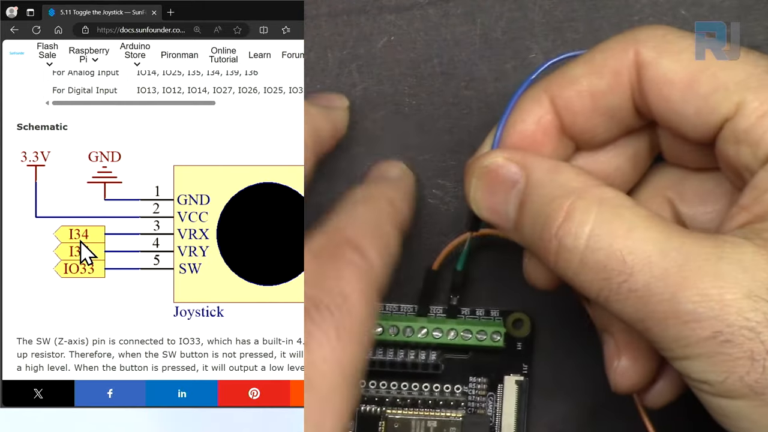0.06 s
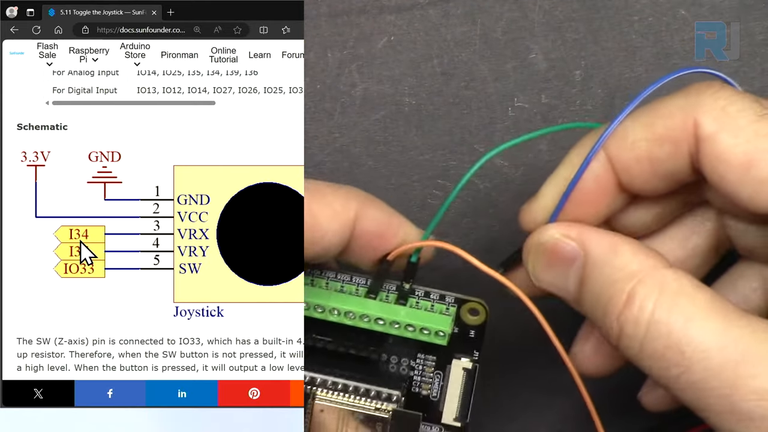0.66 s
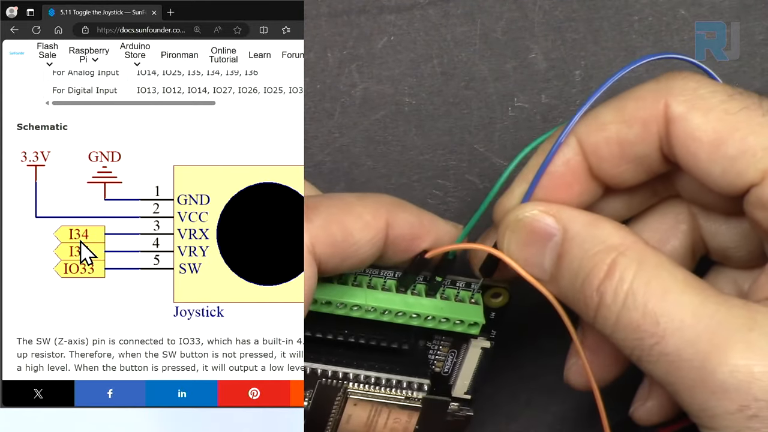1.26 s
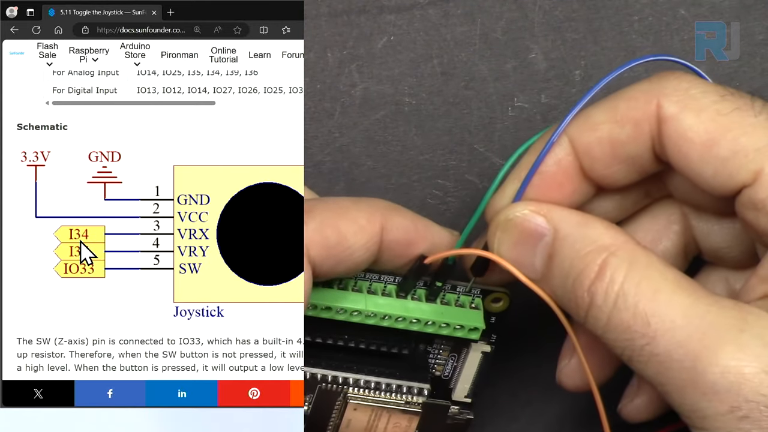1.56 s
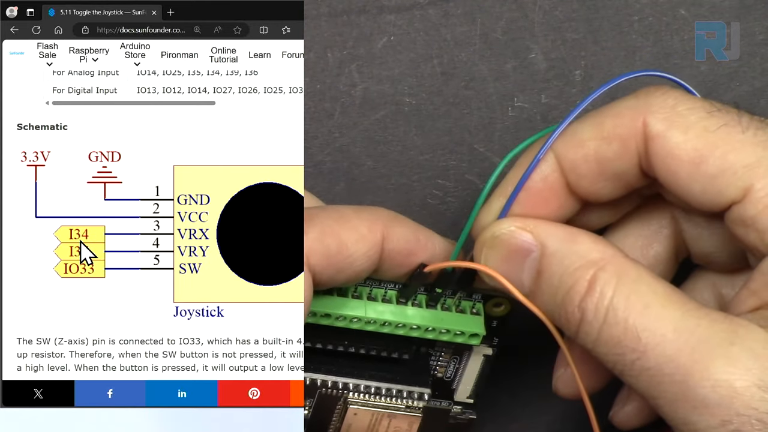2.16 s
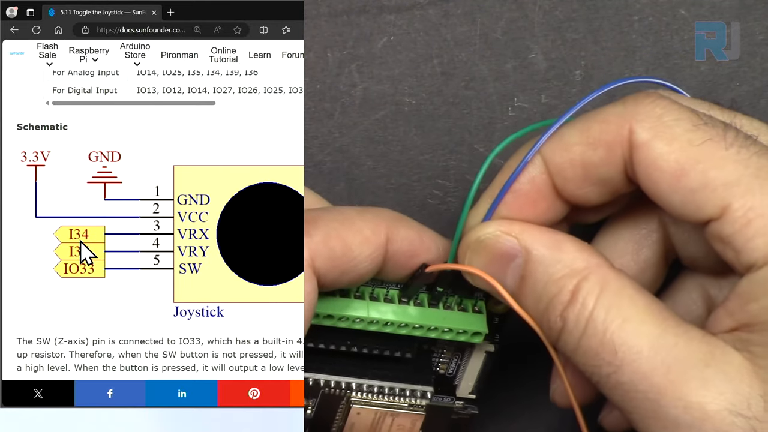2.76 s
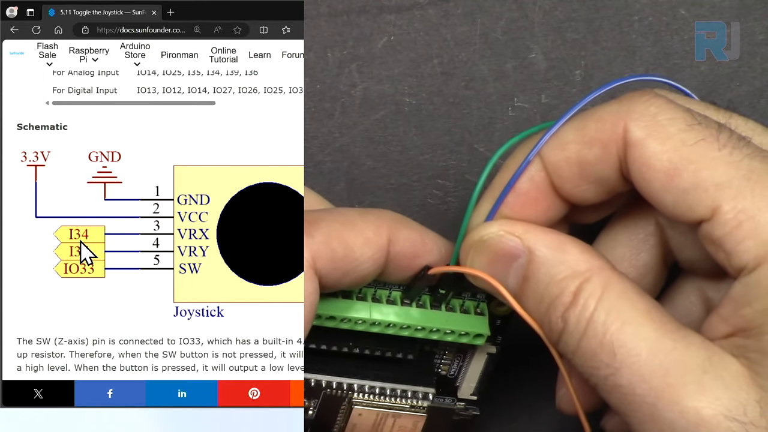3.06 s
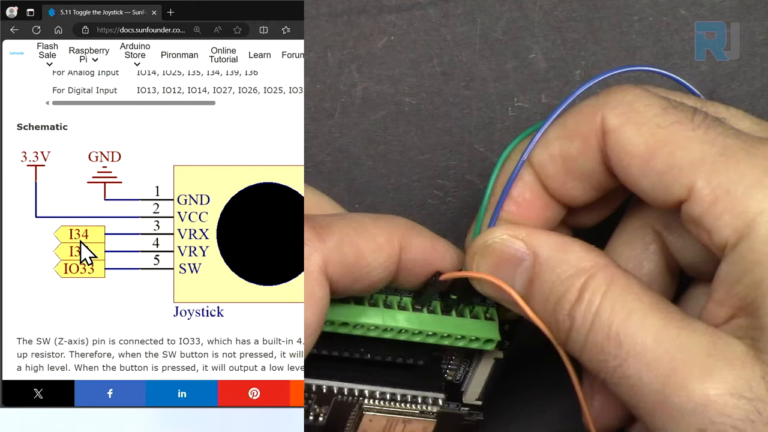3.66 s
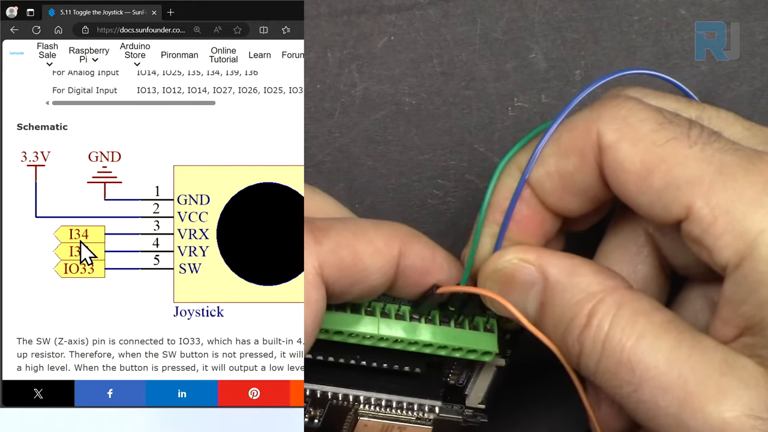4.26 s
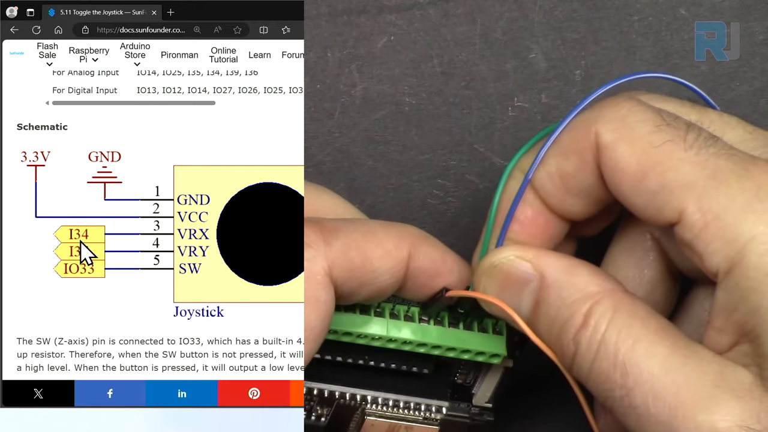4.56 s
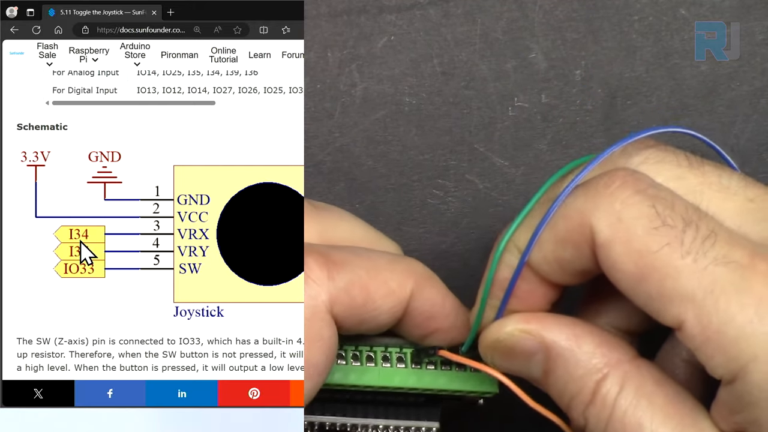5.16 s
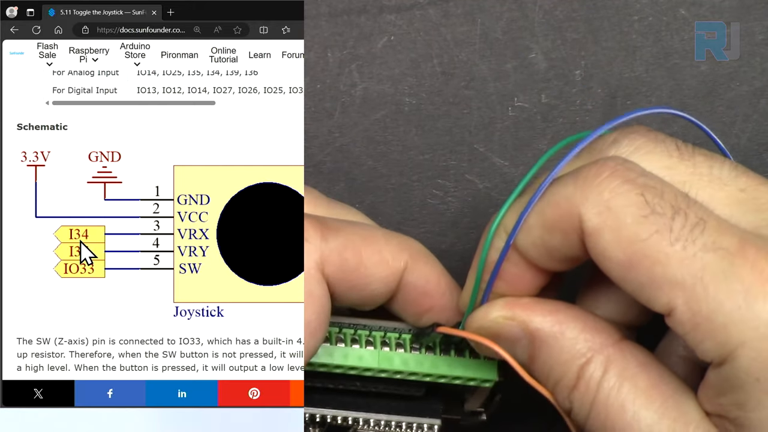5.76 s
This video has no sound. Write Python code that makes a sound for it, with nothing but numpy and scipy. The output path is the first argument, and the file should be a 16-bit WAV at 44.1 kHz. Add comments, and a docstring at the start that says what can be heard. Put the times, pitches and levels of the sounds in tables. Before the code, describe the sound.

Right at the start, a small circuit board knocks on a desk with a short, hollow ring, and a sharp plastic plug click follows at about 0.15 seconds. The board scrapes briefly on a mat while fingers rustle along wires until about 0.6 seconds. A lighter click comes near 0.8 seconds, then a lull. Between 2 and 3.2 seconds, plugs tick faintly against pins, most clearly around 2.9 and 3.1 seconds. From about 3.7 seconds, fingers rub the wires very softly. Handling grows a little from 5 seconds, with a few tiny ticks, the board sliding on the mat, a faint desk rumble and one more click near 5.8 seconds. Everything after the opening is quiet. The microphone is close, in a small room with steady soft air noise and a faint low electrical hum.

```python
"""First comes a sharp knock and click, close up: a small circuit board rocks on a desk mat as hands
push jumper wires onto its header pins. Plastic plugs snap against the pins, the board sticks and slips
over the mat, and fingers rustle along the wires, with a lull midway and more handling near the end.
One close microphone hears it all in a small room, over soft air and a faint mains hum."""
import sys
import numpy as np
from scipy import signal
from scipy.fft import rfft, irfft, next_fast_len
from scipy.io import wavfile
from scipy.ndimage import uniform_filter1d

SR = 44100
rng = np.random.default_rng(int(sys.argv[2]) if len(sys.argv) > 2 else 0)


def output_pcm(signal):
    """Save a mono or channel-first signal as 16-bit PCM at the path in sys.argv[1].

    Samples are clipped to [-1, 1] before scaling.
    """
    pcm = np.clip(np.atleast_2d(signal).T, -1, 1) * 32767
    wavfile.write(sys.argv[1], SR, np.round(pcm).astype(np.int16))


N = 265349
TIME = np.arange(N) / SR

# The board rocking onto the desk. Each row: start in seconds, peak in dB, contact time in ms.
BOARD_KNOCKS = [(0.0614, -14, 0.45), (.0644, -14.5, 0.88), (.1495, -35.5, 0.22), (5.571, -54, 3.1)]
# Modes of the board on the desk. Each row: frequency in Hz, level in dB, time to fall 60 dB in seconds.
BOARD_MODES = [(391, -8.5, 0.17), (440, -4.5, 0.18), (579, -4, 0.068), (635, 9, .014), (786, -15, .12),
               (940, -13.5, .1), (1120, -0.5, .065), (1281, -21, .1), (1510, -23, .17), (1750, -5, 0.016)]
# Plugs meeting pins. Each row: start in seconds, peak in dB, ring in Hz, ring over snap in dB,
# rebound delay in ms, housing resonance in Hz, housing over snap in dB.
PLUG_CLICKS = [(0.051, -38.5, 4150, 5, .9, 3800, 4), (0.0628, -29, 7000, -2.5, 1.2, 5100, -10),
               (.1478, -15.5, 3690, 0.5, 0.715, 3000, -9.5), (0.1488, -31.5, 2080, 5, 2.2, 1510, -3),
               (0.2447, -35.5, 5300, 5, .6, 4600, -14), (0.7745, -35, 4650, 5, .76, 5670, -18),
               (2.11, -57, 5800, -3, 1, 4000, -14), (2.517, -53.5, 4500, -4, 1.6, 2000, -8),
               (2.701, -57, 5500, -9, 1, 4000, -16), (2.85, -37.5, 6300, -10, 1.5, 1860, -17),
               (2.9613, -49, 6460, -5.5, 0.68, 5050, -12), (3.1158, -41, 5400, -10, .65, 2600, -17),
               (3.1263, -44, 6560, -11, 0.7, 2000, -22), (5.019, -51, 6200, -3, 1.1, 4000, -10),
               (5.061, -48.5, 6600, -14, 2.5, 2970, -18), (5.244, -55, 3700, 6, 1.2, 2500, -12),
               (5.79, -35, 5640, -15, 3, 1730, -6)]
# The dry snap of plug plastic. Each row: frequency in Hz, gain in dB.
SNAP_SPECTRUM = [(200, -8), (900, -2.5), (1700, 1.5), (2600, -14.5), (4500, 3), (6300, 3), (8200, -9.5),
                 (10500, -2.5), (13200, -13), (15500, -2.5)]
# The board sliding on the mat. Each row: peak time in seconds, level in dB, rise and fall in seconds,
# centre of the scrape at the peak in Hz.
BOARD_SLIDES = [(.015, -54.5, .02, .08, 800), (.344, -37, 0.033, 0.046, 1250),
                (.38, -47.5, .025, 0.073, 500), (.54, -71, .06, .07, 1580), (4.53, -66.5, 0.093, .13, 1150),
                (4.8, -77, .04, .08, 2000), (5.01, -56.5, .1, 0.29, 610), (5.571, -49.5, 0.0077, .08, 472),
                (5.607, -53.5, .04, 0.28, 720), (5.715, -43.5, 0.079, .13, 790),
                (5.795, -54.5, .03, .04, 950), (5.858, -51.5, .025, .14, 870)]
# The scrape of the board's feet. Each row: frequency in Hz, gain in dB.
SCRAPE_SPECTRUM = [(100, -56), (280, 7), (420, 3.5), (700, -1), (1000, -6), (1500, -1.5), (2200, -11),
                   (3000, -21), (6000, -42)]
# Resonances of the dragged board. Each row: centre in Hz, width in Hz, boost in dB.
SCRAPE_RESONANCES = [(391, 30, 5), (479, 19, 9), (677, 115, 6.5), (790, 45, 7.5), (976, 75, 8.5),
                     (1127, 43, 4.5), (1356, 70, 5), (1570, 70, 4.5)]
# Fingers rubbing wire or plug. Each row: peak time in seconds, level in dB, rise and fall in seconds,
# treble tilt in dB.
FINGER_RUBS = [(.005, -59, .02, .08, -8), (.068, -52, 0.046, 0.068, -8), (.105, -58.5, .03, 0.069, 4),
               (.26, -59, .45, .17, -6), (.304, -44, .006, .07, -12.5), (0.327, -46, 0.031, 0.12, -5.5),
               (.42, -49, .09, 0.092, -7), (.535, -55, .1, 0.077, -4), (.745, -70, .06, 0.094, 18),
               (3.696, -76.5, .05, .04, 9), (3.79, -68.5, .03, .12, -5), (3.845, -68.5, 0.048, 0.065, -19),
               (3.97, -71.5, .04, .09, -22), (4.19, -79, .1, .06, -18), (4.346, -74.5, 0.055, .06, 3),
               (4.54, -71, 0.073, .09, -1), (4.793, -64, 0.023, .12, -25), (4.828, -61.5, .035, .11, -14.5),
               (5.02, -59, 0.087, 0.053, -8), (5.08, -61, 0.047, .14, 0), (5.245, -72.5, 0.19, .06, -19),
               (5.59, -66.5, 0.048, 0.34, -5), (5.708, -54, 0.088, 0.16, -2.5),
               (5.793, -54, .025, 0.043, 4), (5.825, -58, .025, .08, -17), (5.872, -60, 0.055, 0.082, -3),
               (5.965, -70, 0.043, .09, -23)]
# Skin on insulation. Each row: frequency in Hz, gain in dB.
RUB_SPECTRUM = [(700, -8.5), (1500, -8), (2200, -6), (3000, -11), (3900, -7), (4700, -3.5), (6200, -2),
                (7500, -6.5), (10500, -11.5), (13500, -15.5), (16000, -17.5)]
# Resonances of the rubbed plugs. Each row: centre in Hz, width in Hz, boost in dB.
PLUG_RESONANCES = [(3870, 150, 5.5), (4730, 300, 3.5), (5800, 440, 2), (8950, 400, 1)]
# Fingers pressing the board. Each row: peak time in seconds, level in dB, rise and fall in seconds.
FINGER_PRESSES = [(.064, -50, .004, 0.064), (.152, -50, .012, 0.047), (3, -70.5, .2, 0.72),
                  (5.6, -61.5, 2.8, 1.2), (5.79, -53.5, 0.13, 0.23)]
# The desk's rumble under the fingers. Each row: frequency in Hz, gain in dB.
RUMBLE_SPECTRUM = [(25, -5.5), (70, -6.5), (130, -4), (195, 1), (300, -8.5), (500, -10.5), (1000, -43)]
# The air of the room. Each row: frequency in Hz, gain in dB.
AIR_SPECTRUM = [(20, 7), (42, -8), (54, 5.5), (64, -5.5), (82, -10), (110, -6), (170, 1), (260, -3.5),
                (310, -5), (400, -5), (520, -10), (580, -3.5), (690, -12), (930, -7), (1250, -14.5),
                (2400, -22), (7000, -26.5), (15500, -34.5)]
# The wavering of the lowest hum line. Each row: time in seconds, rms level in dB.
LOW_HUM_LEVELS = [(0, -66.5), (1, -67.5), (3.1, -64), (3.6, -65), (3.8, -81), (4, -70), (4.9, -64.5),
                  (5.6, -63.5), (5.9, -58.5)]
# The steady upper hum lines. Each row: frequency in Hz, rms level in dB.
UPPER_HUM_LINES = [(240, -86), (360, -78), (480.1, -65.5)]
# How far the left channel trails the right. Each row: frequency in Hz, phase lag in radians.
LEFT_LAG = [(2700, 0), (5500, .88), (8300, 1.09), (15400, 2.03)]


def board_knocks():
    """Each blow on the desk rings the board; a longer contact weakens the high modes."""
    out, t = np.zeros(N), TIME[:SR // 4]
    for start, db, contact_ms in BOARD_KNOCKS:
        ring = 0
        for hz, mode_db, t60 in BOARD_MODES:
            strength = undb(mode_db) / (1 + (hz * contact_ms / 1e3) ** 2)
            ring += strength * np.cos(2 * np.pi * hz * t) * fade(t, t60)
        ring = band(ring, order=3, hz=300, kind="high")  # so small a board radiates little bass
        ring = band(ring, order=5, hz=1500, kind="low")  # the mat softens the treble
        add(out, start, undb(db) * ring / np.abs(ring).max())
    return out


def plug_clicks(snap_t60=.0044, ring_t60=.0053, housing_t60=.1, rebound_db=-2, overtone_db=-1.5):
    """A plug snaps against a pin, rings briefly and rebounds once; its housing rings on a little."""
    out, t = np.zeros(N), TIME[:SR // 8]
    for start, db, hz, ring_db, rebound_ms, housing_hz, housing_db in PLUG_CLICKS:
        phase = 2 * np.pi * hz * t
        ring = (np.sin(phase) + undb(overtone_db) * np.sin(1.273 * phase)) * fade(t, ring_t60)
        ring = band(ring, order=2, hz=hz / 2, kind="high")
        for delay, push in ((0, 1), (rebound_ms / 1e3, -undb(rebound_db))):
            snap = colour(rng.standard_normal(len(t)) * fade(t, snap_t60), SNAP_SPECTRUM)
            housing = rng.standard_normal(len(t)) * fade(t, housing_t60)
            housing = band(housing, order=2, hz=[.9 * housing_hz, 1.1 * housing_hz], kind="band")
            click = unit(snap) + undb(ring_db) * unit(ring) + undb(housing_db) * unit(housing)
            add(out, start + delay, push * undb(db) * click / np.abs(click).max())
    return out


def board_scrape(spread_octaves=.8, sink_octaves_per_s=2.7):
    """The board's feet stick and slip on the mat; each slide slows as it goes, so its scrape sinks."""
    scrape = colour(slips(per_s=3800, spread_db=2), SCRAPE_SPECTRUM, SCRAPE_RESONANCES)
    glides = [hz * 2 ** np.clip(sink_octaves_per_s * (peak_s - TIME), -1, 1)
              for peak_s, *_, hz in BOARD_SLIDES]
    gain, centre_hz = gesture(BOARD_SLIDES, glides)
    out, power = 0, 0
    for edge_hz in 177 * 2 ** (np.arange(9) / 2):  # half-octave bands
        bandpass = signal.butter(2, [edge_hz, edge_hz * np.sqrt(2)], "band", fs=SR, output="sos")
        part = signal.sosfiltfilt(bandpass, scrape)
        octaves_away = np.log2(edge_hz * 2 ** .25 / centre_hz)
        weight = np.exp(-.5 * (octaves_away / spread_octaves) ** 2)
        out += weight * part
        power += weight ** 2 * np.var(part)
    return moving_contact(out / np.sqrt(power)) * gain


def finger_rubs(split_hz=4000, flicker_db=.63):
    """Skin slides over insulation with a fine grain; each rub has its own brightness."""
    grain = moving_contact(colour(slips(per_s=4400, spread_db=0), RUB_SPECTRUM, PLUG_RESONANCES))
    gain, tilt_db = gesture(FINGER_RUBS, [row[4] for row in FINGER_RUBS])
    low = signal.sosfiltfilt(signal.butter(2, split_hz, fs=SR, output="sos"), grain)
    tilt = undb(tilt_db / 2)
    return (low / tilt + (grain - low) * tilt) * undb(flicker_db * wander(per_s=97)) * gain


def fingertip_judder(hz=480, wobble=.091):
    """A fingertip sticks and slips unevenly, briefly driving one low mode of the board."""
    cycles = np.cumsum(hz * (1 + wobble * wander(per_s=300))) / SR
    return np.sqrt(2) * np.sin(2 * np.pi * cycles) * stroke(2.978, db=-52, rise_s=.005, fall_s=.045)


def pin_squeak(hz=5200, width_hz=160):
    """A plug tip slides along a pin, metal on metal, in one narrow resonance."""
    friction = slips(per_s=2100, spread_db=2)
    squeak = band(friction, order=2, hz=[hz - width_hz / 2, hz + width_hz / 2], kind="band")
    return unit(squeak) * stroke(.718, db=-68, rise_s=.025, fall_s=.085)


def desk_rumble(flicker_db=1.5):
    """Pressing fingers make the desk rumble faintly."""
    rumble = unit(colour(rng.standard_normal(N), RUMBLE_SPECTRUM))
    pressure = sum(stroke(*row) for row in FINGER_PRESSES)
    return rumble * pressure * undb(flicker_db * wander(per_s=24))


def room_air(rms_db=-63.5):
    """Steady, mostly low air noise all around the microphone."""
    return unit(colour(rng.standard_normal(N), AIR_SPECTRUM)) * undb(rms_db)


def mains_hum(low_hz=120):
    """Faint mains hum in the room: the lowest line wavers in level, the upper ones hold steady."""
    lines = [(low_hz, np.interp(TIME, *np.transpose(LOW_HUM_LEVELS)))] + UPPER_HUM_LINES
    return sum(np.sqrt(2) * undb(db) * np.sin(2 * np.pi * (hz * TIME + rng.random())) for hz, db in lines)


def room(x, wet_db, low_t60=.19, high_t60=.065, gap_s=.0024):
    """The direct sound, then diffuse reflections of a small room; their treble is weak and dies first."""
    t = TIME[:SR // 2]
    noise = rng.standard_normal(len(t))
    low = band(noise, order=1, hz=2500, kind="low")
    tail = (low * fade(t, low_t60) + (noise - low) * fade(t, high_t60)) * (t > gap_s)
    tail = band(tail / np.linalg.norm(tail), order=1, hz=8040, kind="low")
    return x + undb(wet_db) * signal.fftconvolve(x, tail)[:N]


def slips(per_s, spread_db):
    """Friction: a dense stream of tiny slips of uneven size."""
    impulses = (rng.random(N) < per_s / SR) * rng.standard_normal(N)
    return impulses * undb(spread_db * np.clip(rng.standard_normal(N), -2, 2))


def moving_contact(x, ripple_db=1.7):
    """The contact point keeps moving, so small resonances come and go."""
    _, _, cells = signal.stft(x, nperseg=512)
    ripple = uniform_filter1d(rng.standard_normal(cells.shape), size=3, axis=0)
    ripple = uniform_filter1d(ripple, size=5, axis=1)
    _, rippled = signal.istft(cells * undb(ripple_db * unit(ripple)))
    return unit(rippled[:N])


def stroke(peak_s, db, rise_s, fall_s):
    """Gain of one hand movement: it grows tenfold in rise_s to its peak, then sinks tenfold in fall_s."""
    rise = (np.maximum(peak_s - TIME, 0) / rise_s) ** 1.37  # rounded: a hand speeds up smoothly
    decades_down = np.maximum(rise, (TIME - peak_s) / fall_s)
    return undb(db - 20 * np.minimum(decades_down, 10))


def gesture(rows, values):
    """Joint gain of overlapping movements, and a blend of their values that favours the strongest."""
    powers = [stroke(*row[:4]) ** 2 for row in rows]
    total = sum(powers)
    return np.sqrt(total), sum(power * value for power, value in zip(powers, values)) / total


def wander(per_s):
    """Smooth random drift with a spread near 1."""
    hold = int(SR / per_s)
    return uniform_filter1d(np.repeat(rng.standard_normal(N // hold + 1), hold), hold)[:N]


def colour(x, points, resonances=()):
    """Causal filter through (Hz, dB) points, with optional (Hz, width, dB) resonances on top."""
    size = next_fast_len(len(x) + len(x) % 2, True) * 2
    freqs = np.maximum(np.fft.rfftfreq(size, 1 / SR), 1)
    hz, db = np.transpose(points)
    curve_db = np.interp(np.log(freqs), np.log(hz), db)
    curve_db += sum(boost / (1 + (2 * (freqs - mid) / width) ** 2) for mid, width, boost in resonances)
    cepstrum = irfft(np.log(undb(curve_db)))
    cepstrum[1:size // 2] *= 2  # fold to minimum phase
    cepstrum[size // 2 + 1:] = 0
    return irfft(rfft(x, size) * np.exp(rfft(cepstrum)))[:len(x)]


def band(x, order, hz, kind):
    """Butterworth filter."""
    return signal.sosfilt(signal.butter(order, hz, kind, fs=SR, output="sos"), x)


def fade(t, t60):
    """Exponential decay of 60 dB in t60 seconds."""
    return np.exp(-np.log(1000) * t / t60)


def add(track, start_s, sound):
    """Mix a sound in at start_s."""
    i = max(int(start_s * SR), 0)
    track[i:i + len(sound)] += sound[:N - i]


def undb(db):
    """Decibels to gain."""
    return 10 ** (np.asarray(db) / 20)


def unit(x):
    """Scale to rms 1."""
    return x / np.sqrt(np.mean(x ** 2))


def scene():
    """The desk from close by, the room behind it; the left channel's treble trails very slightly."""
    friction = board_scrape() + finger_rubs() + pin_squeak() + fingertip_judder()
    handling = room(board_knocks(), wet_db=-14) + room(plug_clicks(), wet_db=-10)
    handling += room(friction, wet_db=-12)
    mono = handling + desk_rumble() + room_air() + mains_hum()
    lag = np.interp(np.fft.rfftfreq(N, 1 / SR), *np.transpose(LEFT_LAG))
    left = irfft(rfft(mono) * np.exp(-1j * lag), N)
    return np.array([left, mono])


def record(dry, hiss_db=-84, top_hz=15850):
    """Each channel adds faint hiss; a gentle treble lift brightens the sound; the band ends steeply."""
    noisy = dry + undb(hiss_db) * rng.standard_normal(dry.shape)
    bright = np.array([colour(x, [(2000, 0), (6000, 1.96), (10000, 4.0), (16000, 6.5)]) for x in noisy])
    return signal.sosfilt(signal.ellip(10, .2, 70, top_hz, fs=SR, output="sos"), bright)


dry = scene()
out = record(dry)
output_pcm(out)
```